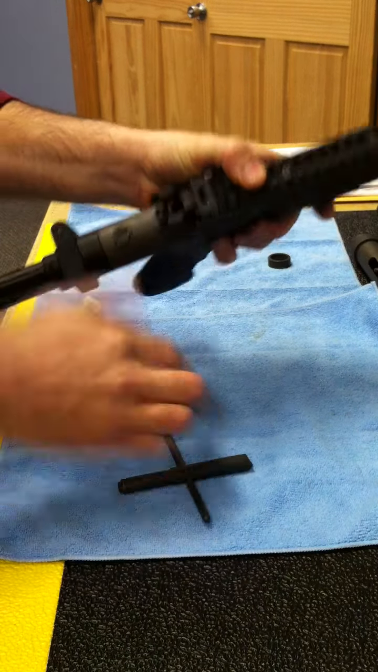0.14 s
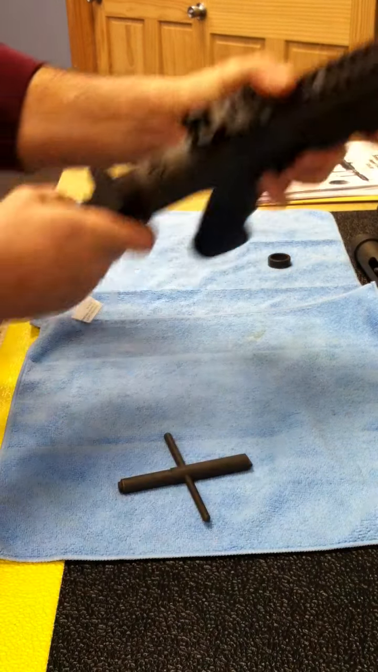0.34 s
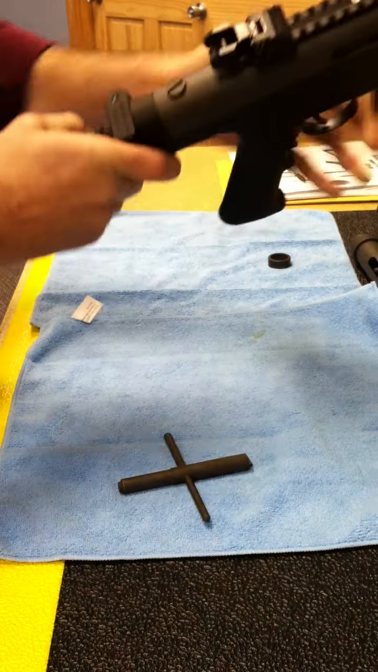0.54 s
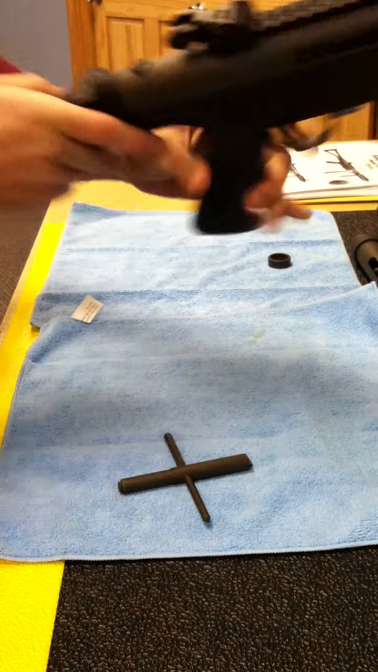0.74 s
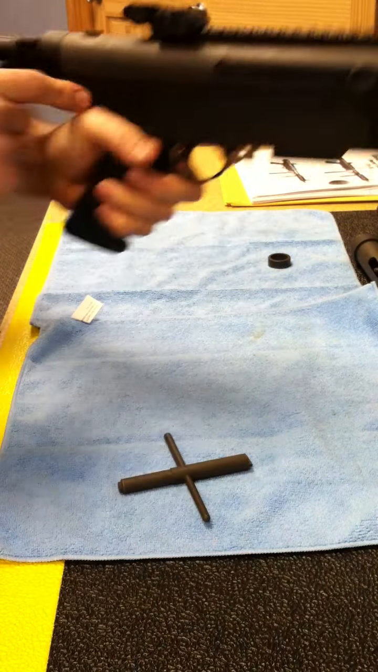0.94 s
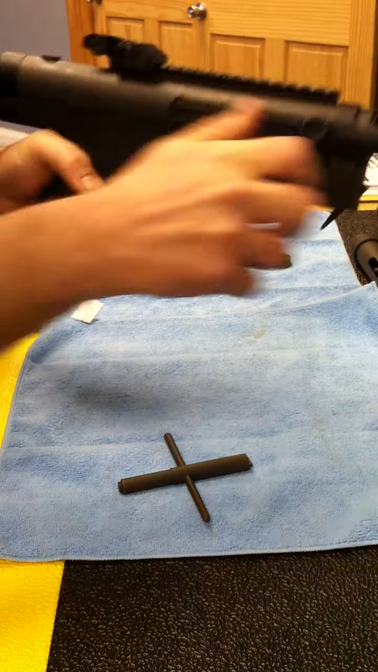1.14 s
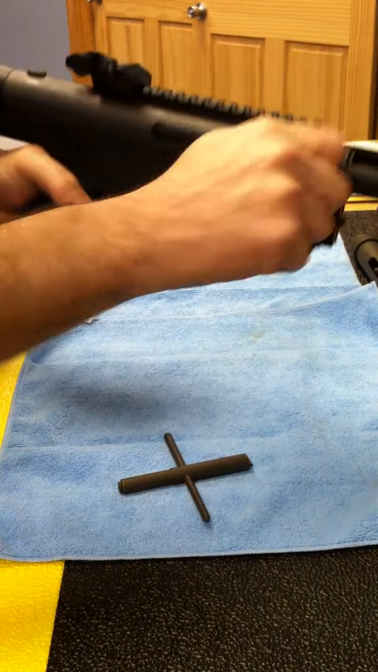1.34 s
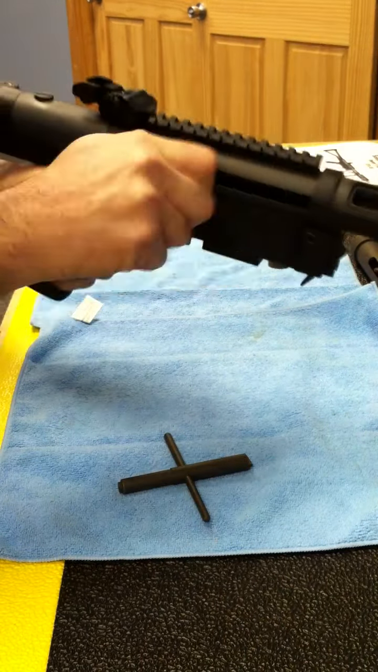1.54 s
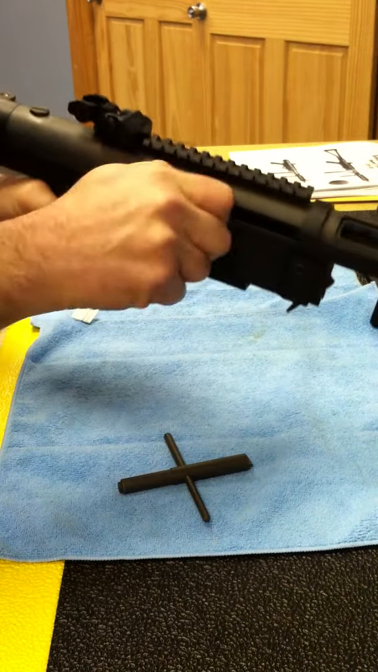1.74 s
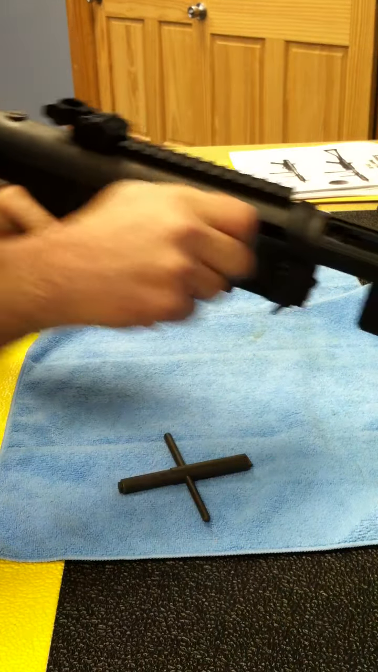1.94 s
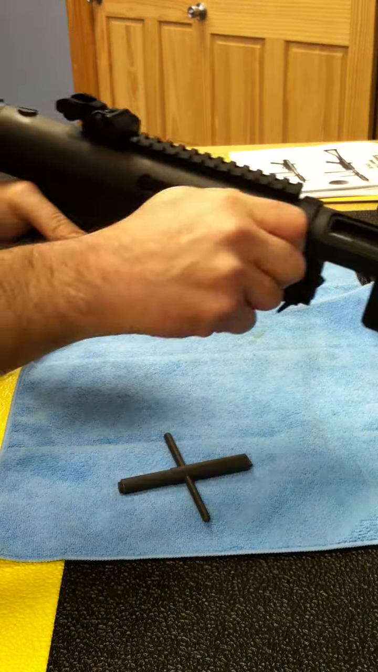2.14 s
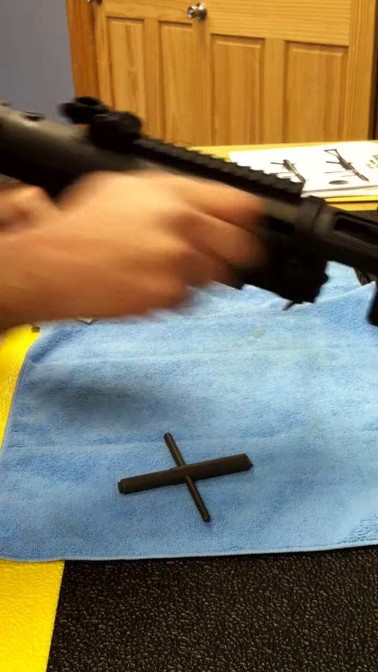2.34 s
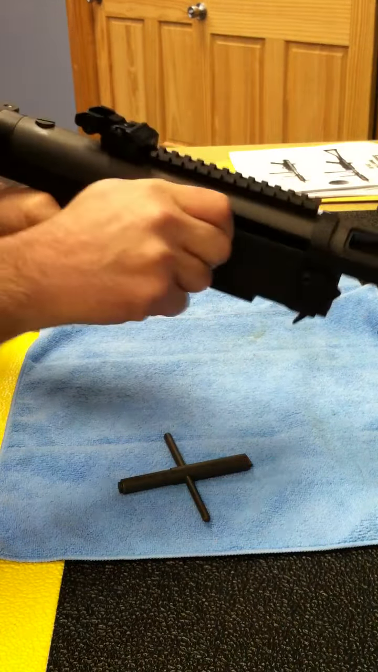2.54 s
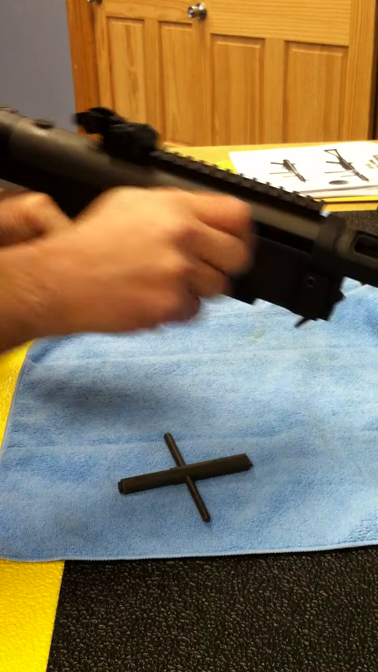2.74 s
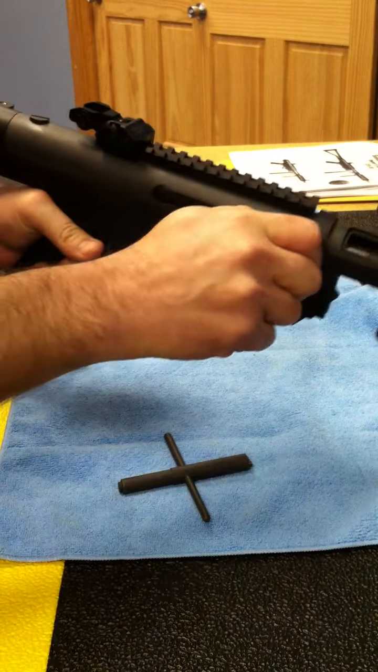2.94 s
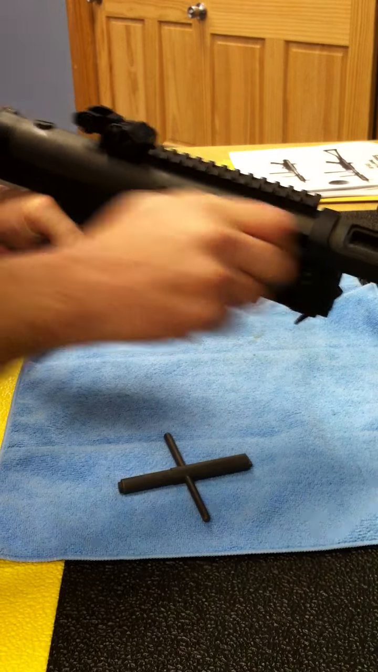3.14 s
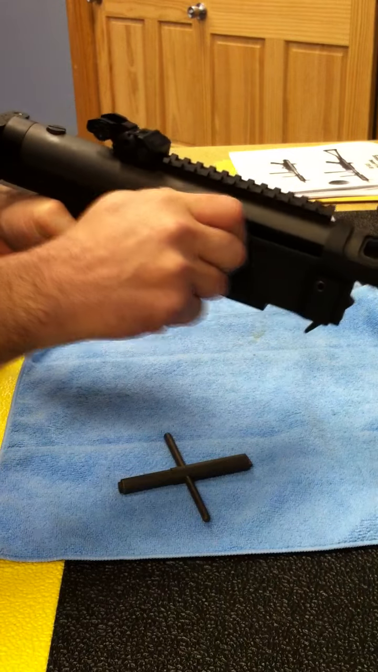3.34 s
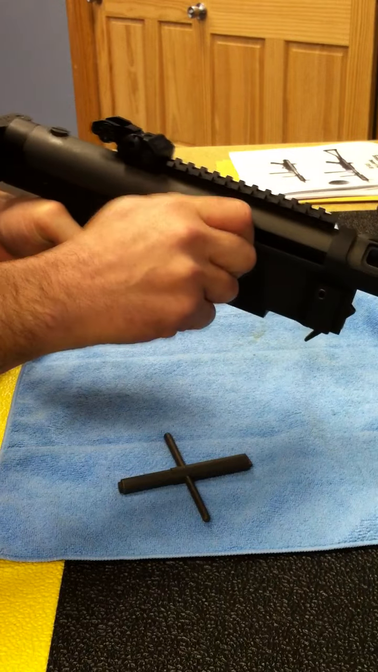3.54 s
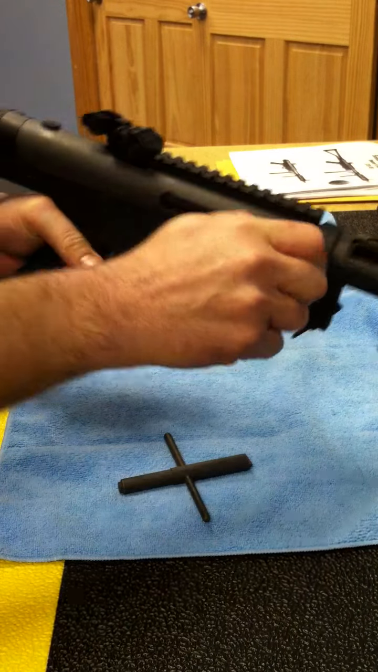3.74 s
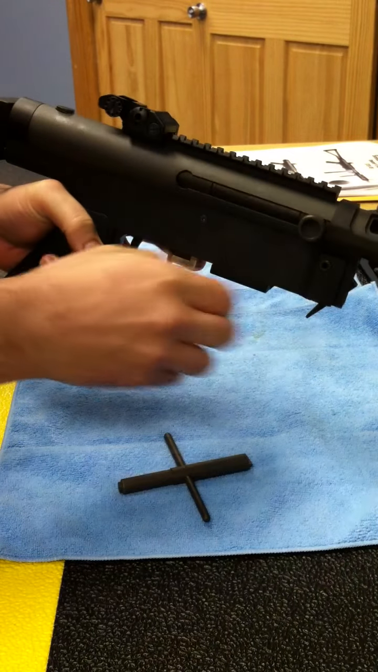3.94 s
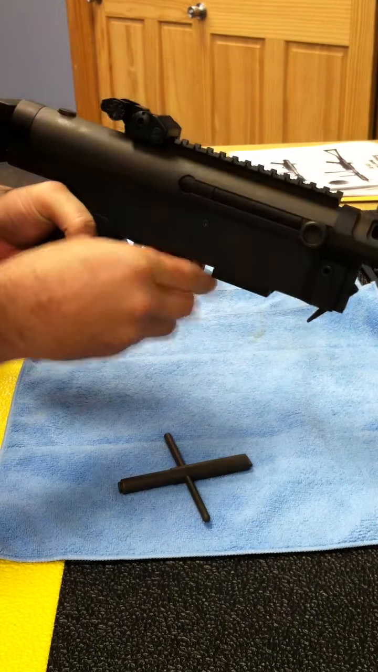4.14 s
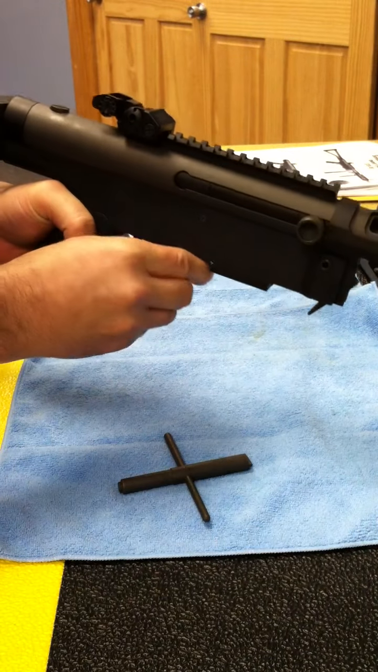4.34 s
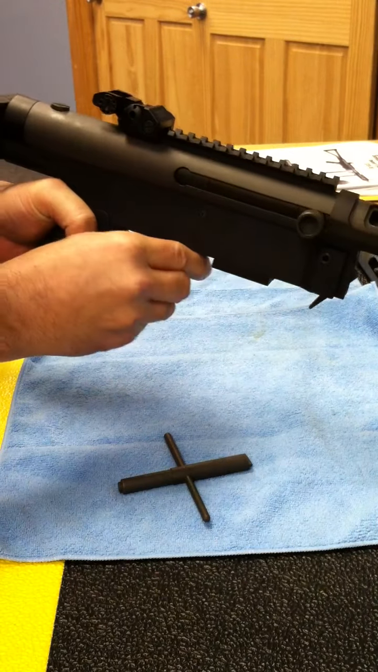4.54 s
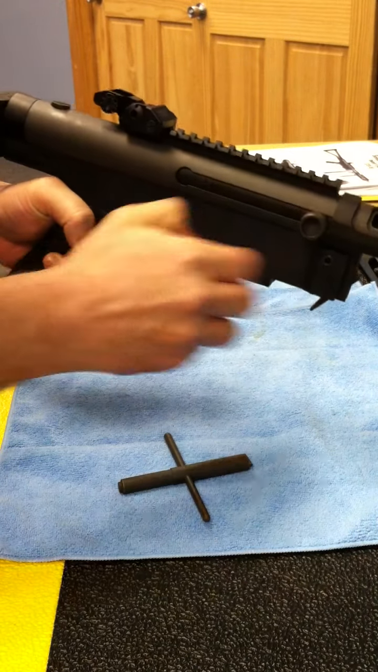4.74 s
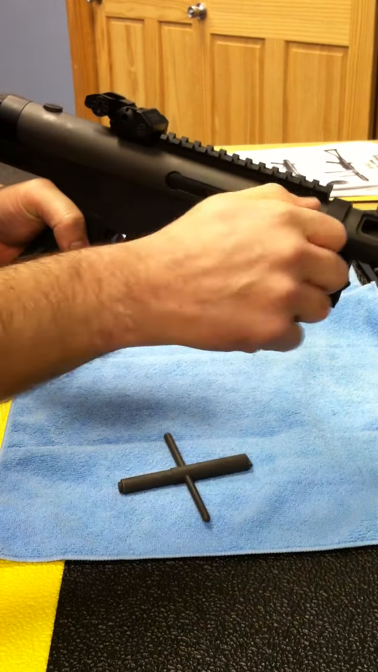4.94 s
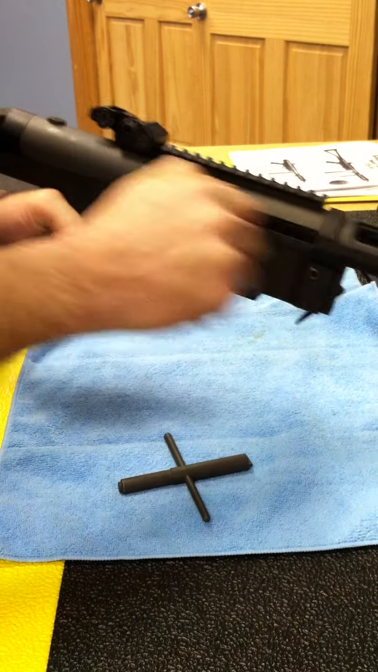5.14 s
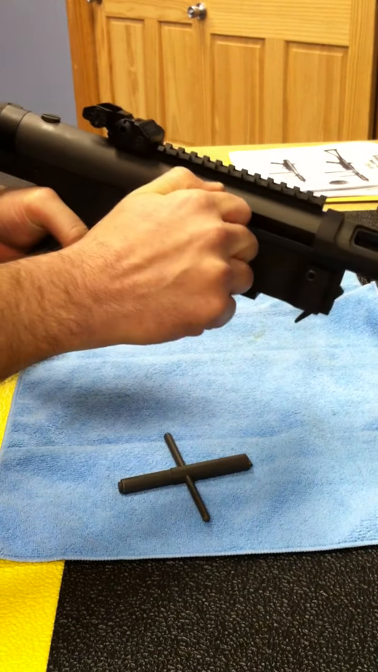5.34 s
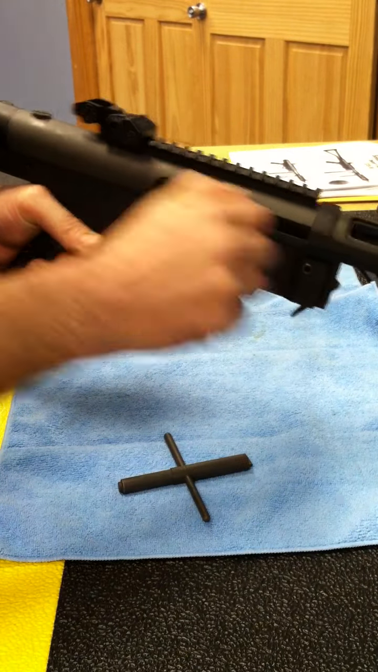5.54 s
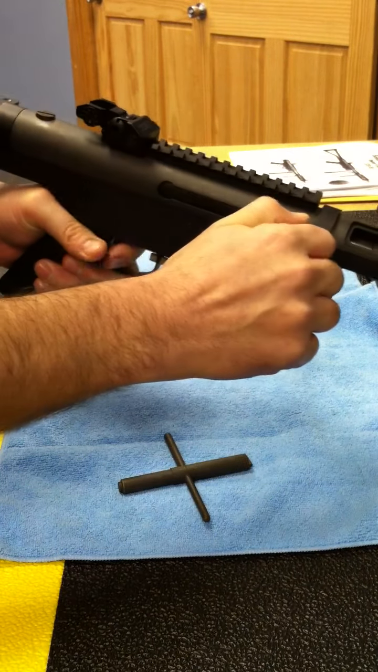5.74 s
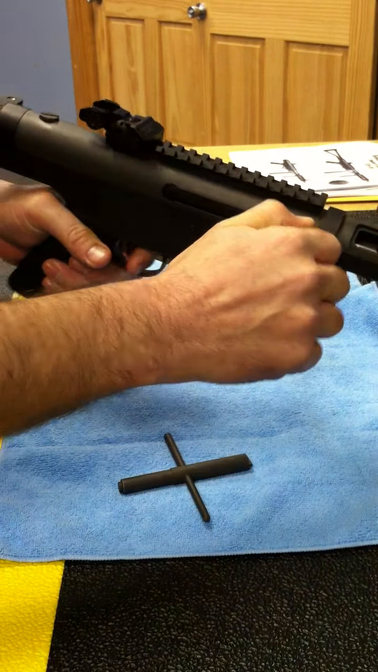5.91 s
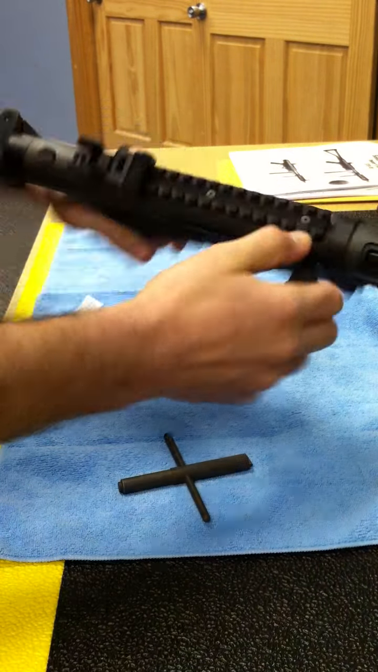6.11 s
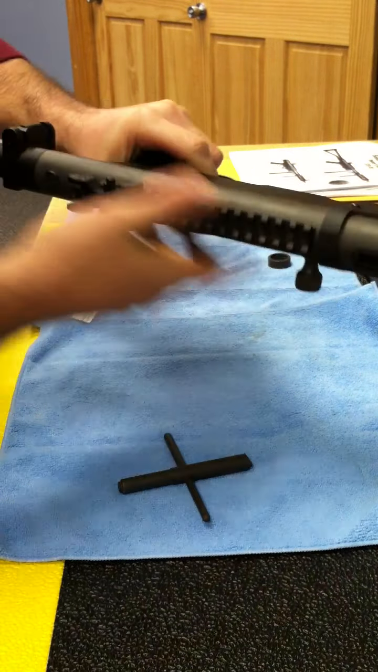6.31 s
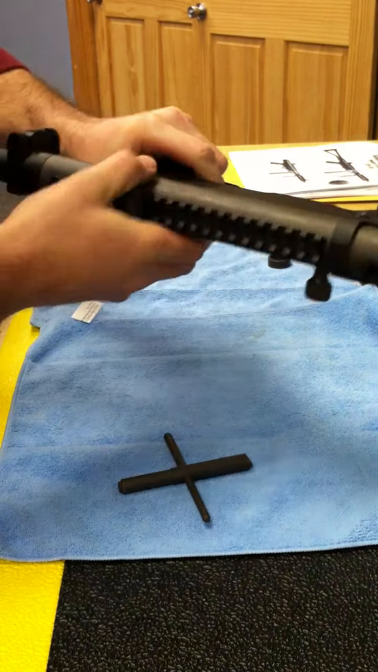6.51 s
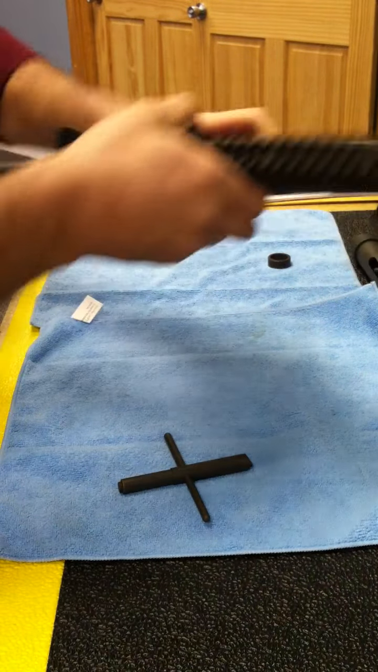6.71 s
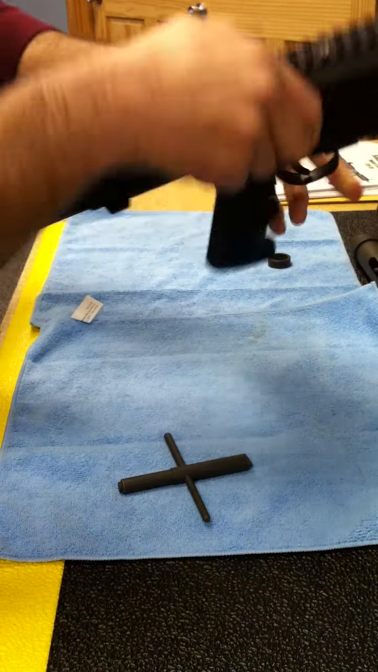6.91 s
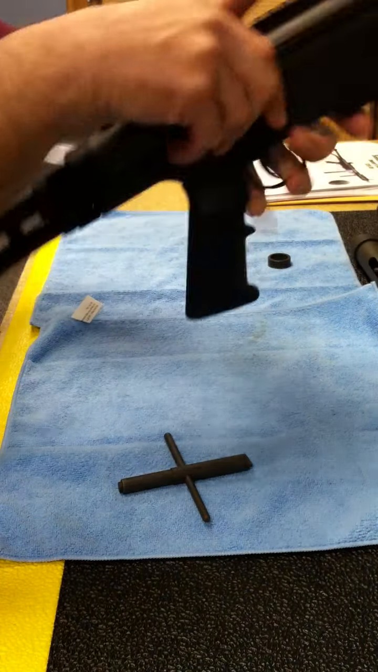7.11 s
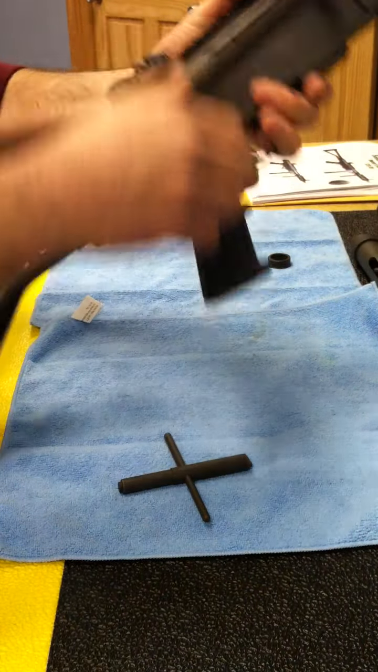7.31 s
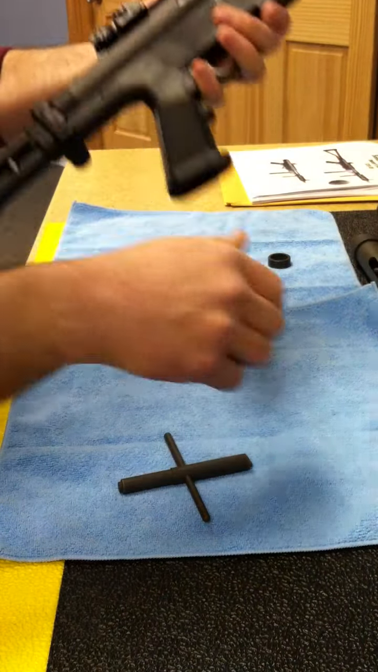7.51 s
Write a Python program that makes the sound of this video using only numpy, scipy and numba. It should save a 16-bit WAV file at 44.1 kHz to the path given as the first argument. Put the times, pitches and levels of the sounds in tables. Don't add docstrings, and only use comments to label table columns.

```python
import sys
import numpy as np
from scipy import signal
from scipy.fft import rfft, irfft
from scipy.io import wavfile
from scipy.ndimage import uniform_filter1d
from numba import njit

SR = 44100
rng = np.random.default_rng(int(sys.argv[2]) if len(sys.argv) > 2 else 0)


def unload_audio(sound):
    columns = np.transpose(np.atleast_2d(sound))
    steps = np.round(np.clip(columns, -1, 1) * 32767)
    wavfile.write(sys.argv[1], SR, steps.astype(np.int16))


def ratio(d):
    e = np.asarray(d, float) / 20
    return 10 ** e


N = 333788

# (time [s], peak [dB], body shift [dB], treble shift [dB], contact chatter [ms])
STOP_BLOWS = [
    (1.6465, -4.5, 1.5, 5, 3.2),
    (1.6654, -9, 4.5, -6, 4.8),
    (2.5038, -8, -9, 4.5, 5.2),
    (2.5184, -4, 2, -9, 1.8),
    (3.3197, -11.5, -3, 1.5, 3.3),
    (3.3352, -8, 2.5, -8.5, 1.5),
    (5.2825, -6, 0.5, 7, 2.48),
    (5.3033, -15.5, 5, -6.5, 4.6),
]
# (time [s], peak [dB], body shift [dB], treble shift [dB], contact chatter [ms])
CATCH_BLOWS = [(1.7545, -14.5, 0, 1.5, 15.6), (1.758, -3.5, 4, 2, 2.8), (2.66, -14.5, -1, -0.5, 11.4),
               (2.6656, -9.5, 0.5, -2, 7.8), (3.471, -17.5, -3, 2, 2.1), (3.4742, -18, -0.5, 4, 0.93),
               (3.4773, -11.5, 2, 0, 4.2), (5.3949, -13, 0.5, 13, 3.6), (5.399, -6.5, 5, 0, 3),
               (5.6517, -19, -4, 1.5, 7.9), (5.6589, -13, -4.5, -7.5, 2.8)]
# (time [s], peak [dB], body shift [dB], treble shift [dB], contact chatter [ms])
SLAM_BLOWS = [
    (2.121, -31, -6.5, -7.5, 1.9),
    (2.1245, -3.5, -11, 1.5, 2.43),
    (2.9584, -34.5, 1, 7.5, 3.5),
    (2.959, -5.5, -11, 5, 2.4),
    (3.7723, -34.5, 3.5, -6.5, 1.8),
    (3.776, -4.5, -10.5, 4, 1.5),
    (5.728, -25.5, -3.5, -1, 2.24),
    (5.7316, -4, -11.5, 2.5, 1.95),
]


def colour(x, tone):
    hz, db = np.transpose(tone)
    size = 4096
    grid = np.log(np.arange(size // 2 + 1) * SR / size + 1)
    ceps = irfft(np.interp(grid, np.log(hz), db) * np.log(10) / 20)
    ceps[1:size // 2] *= 2
    ceps[size // 2 + 1:] = 0
    response = irfft(np.exp(rfft(ceps)))
    return signal.fftconvolve(x, response)[:len(x)]


def unit(x):
    return x / np.sqrt(np.mean(x ** 2))


def even(burst, width_hz):
    spectrum = rfft(burst)
    broad = uniform_filter1d(np.abs(spectrum) ** 2, int(width_hz * len(burst) / SR))
    return irfft(spectrum / np.sqrt(broad), len(burst))


def add(out, s, x):
    i = int(s * SR)
    out[i:i + len(x)] += x[:len(out) - i]


def ring(modes, sway):
    t = np.arange(SR // 4)[:, None] / SR
    hz, db, t60 = np.transpose(modes)
    strength = ratio(db + 4.0 * sway[0])
    decay = np.exp(-np.log(1000) * t / t60)
    tones = np.sin(2 * np.pi * hz * (1 + 0.014 * sway[1]) * t)
    return (strength * decay * tones).sum(1)


def grit(rate, spread_db):
    k = int(SR / rate)
    steps = np.repeat(np.minimum(rng.exponential(size=N // k + 1), 2), k)[:N]
    return unit(rng.standard_normal(N) * ratio(spread_db * uniform_filter1d(steps, k)))


@njit
def svf(x, hz, width):
    y, b, l = np.empty(len(x)), 0., 0.
    for i in range(len(x)):
        g, k = np.tan(np.pi * hz[i] / SR), width / hz[i]
        v = (b + g * (x[i] - l)) / (1 + g * (g + k))
        b, l, y[i] = 2 * v - b, l + 2 * g * v, k * v
    return y


def blows(events, tone, ring_db):
    # (frequency [Hz], level [dB], t60 [s])
    steel = [(1505, -9.5, .025), (2190, -5, 0.03), (2667, -11.5, .025), (4700, -2, 0.0099),
             (7480, -12, 0.14)]
    room_ring_db, room_peak_db = -20, -4.5
    out, t = np.zeros((2, N)), np.arange(SR // 20) / SR
    push = 1. * (t == 0)
    for s, peak_db, body_db, treble_db, chatter_ms in events:
        decay = np.exp(-t * 1000 / max(chatter_ms, .2)) + 0.061 * np.exp(-t / 0.0049)
        chatter = rng.standard_normal(len(t)) * decay * (1 - np.exp(-t / 0.00014))
        contact = colour(even(chatter, 1100), [(250, -33), (600, 0)])
        contact += colour(push, [(300, 4.0), (700, -27.5)])
        modes = ratio(ring_db) * ring(steel, rng.standard_normal((2, len(steel))))
        modes[0] = 1
        hit = colour(signal.fftconvolve(contact, modes), tone)
        wide_modes = np.append(1, ratio(room_ring_db) * modes[1:])
        wide = colour(wide_modes, np.minimum(tone, [SR, room_peak_db]))
        shift = [(1400, body_db), (2200, 0.013), (5000, 0.0052), (7000, treble_db)]
        hit, wide = colour(hit, shift), colour(wide, np.array(shift) * [1, .45])
        for row, x in zip(out, (hit, wide)):
            add(row, s, x[:SR // 4] * ratio(peak_db) / np.abs(hit).max())
    return out


def bolt_blows():
    # (frequency [Hz], level [dB per Hz])
    stop_tone = [(24, -60.5), (40, -35), (194, -36), (354, -12), (503, -12.5), (1240, -0.5), (1760, -5.5),
                 (1900, -3.5), (7730, -8), (10200, -17.5), (16000, -46.5)]
    # (frequency [Hz], level [dB per Hz])
    catch_tone = [(24, -58.5), (40, -28), (1040, -6.5), (1340, 1), (1680, -9), (1900, -2.5), (2630, 2.5),
                  (3560, -5), (4340, -3.5), (9940, -13.5), (16000, -46.5)]
    # (frequency [Hz], level [dB per Hz])
    slam_tone = [(40, -37), (300, -18), (800, 1.5), (1300, -2), (2200, -7.5), (4600, -1), (7000, -4),
                 (9900, -10), (12500, -25.5), (16000, -39)]
    stops = blows(STOP_BLOWS, stop_tone, -38.0)
    catches = blows(CATCH_BLOWS, catch_tone, -45.5)
    return stops + catches + blows(SLAM_BLOWS, slam_tone, -32.0)


def stroke(start, end):
    t = np.arange(N) / SR
    onset_s = 0.012
    gone = np.clip((t - start) / (end - start), 0, 1)
    gate = np.clip(np.minimum(t - start, end + 0.012 - t) / onset_s, 0, 1)
    return gone, gate


def strokes():
    # (start [s], end [s], scrape level at the end [dB], whistle share [dB])
    pulls = [
        (1.518, 1.627, -44.5, -4),
        (2.435, 2.512, -43.5, -1.5),
        (3.245, 3.314, -48, 1),
        (5.176, 5.28, -46, -5.5),
    ]
    # (start [s], end [s], scrape level at the crest [dB], whistle share [dB])
    returns = [
        (2.024, 2.122, -49.5, 6),
        (2.847, 2.96, -49.5, 4.5),
        (3.68, 3.773, -49, 2),
        (5.673, 5.727, -49.5, 1),
    ]
    shut_hz, back_hz, latched_hz = 2860, 2450, 2330
    pull_swell_db_per_s, pull_ease = 85, 1.4
    whistle_swell_db = 10.5
    return_dip_db, return_ease = 3.5, 1.4
    gain, hz, share = np.zeros(N), np.full(N, 2600.), np.zeros(N)
    for pull, rows in ((True, pulls), (False, returns)):
        for start, end, level_db, whistle_db in rows:
            gone, gate = stroke(start, end)
            if pull:
                loss_db = pull_swell_db_per_s * (end - start) * (1 - gone)
                pitch = shut_hz + (back_hz - shut_hz) * gone ** pull_ease
            else:
                loss_db = return_dip_db * (2 * gone - 1) ** 2
                pitch = shut_hz + (latched_hz - shut_hz) * (1 - gone) ** return_ease
            gain += gate * ratio(level_db - loss_db)
            share += gate * ratio(whistle_db + pull * whistle_swell_db * (gone - 1.0))
            hz = np.where(gate > 0, pitch, hz)
    return gain, share, hz


def slides():
    gain, share, hz = strokes()
    rub = grit(400, 2.0)
    patchy = ratio(2.3 * unit(uniform_filter1d(rng.standard_normal(N), size=400)))
    whistle = unit(svf(svf(rub, hz, 450.), hz, 450.))
    whistle += ratio(-15.0) * unit(svf(rub, 1.7 * hz, 450.))
    upper_hz = 4900 + .85 * hz
    whistle += ratio(-2.5) * unit(svf(grit(60, 2.5), upper_hz, 700.)) / np.maximum(share, .2) ** 0.4
    scrape = unit(colour(rub, [(300, -21.0), (1300, -2.0), (3000, 0.5), (4200, -4.5), (7800, -3.5),
                               (10500, -17.5), (15000, -42)]))
    grind = unit(colour(grit(200, 3.2), [(200, -22.5), (600, -4), (1600, -3.0), (2600, -18.0)]))
    grind = ratio(-14) * grind / np.maximum(share, .2)
    return colour(gain * (scrape + share * patchy * whistle + grind), [(11500, -1.5), (14500, -22.0)])


def pin_and_spring():
    # (time [s], level [dB])
    pin_rings = [
        (2.1245, -56),
        (2.959, -48),
        (3.776, -48),
        (5.7318, -60),
    ]
    pin_hz, pin_t60_s = 9930, 0.28
    spring_hz, spring_t60_s, spring_db = 7080, 0.35, -46
    out, t = np.zeros(N), np.arange(SR // 3) / SR
    for s, level_db in pin_rings:
        decay = np.exp(-np.log(1000) * t / pin_t60_s)
        add(out, s, ratio(level_db) * decay * np.sin(2 * np.pi * pin_hz * t))
    for s, peak_db, *_ in SLAM_BLOWS[1::2]:
        pair = np.sin(2 * np.pi * spring_hz * t) + np.sin(2 * np.pi * (spring_hz + 75) * t)
        decay = np.exp(-np.log(1000) * t / spring_t60_s)
        add(out, s, ratio(peak_db + spring_db) * decay * pair)
    return out


def ticks():
    # (time [s], peak [dB], pitch of the part [Hz])
    finger_ticks = [(0.7452, -56, 4700), (0.919, -55, 8250), (1.3394, -35.5, 3000), (2.3747, -40, 3900),
                    (3.1964, -43, 3664), (4.477, -58, 1750), (4.558, -45, 3196), (4.5705, -52, 6790),
                    (4.671, -61, 2800), (4.7546, -54.5, 3675), (4.805, -54.5, 5980), (5.0158, -31, 7160),
                    (5.037, -54, 6600), (5.0478, -42.5, 2270), (5.0832, -39, 5150), (5.619, -45, 6000),
                    (5.9477, -29, 4594), (6.3814, -47.5, 3140), (6.809, -62, 4990), (6.839, -62, 2500),
                    (7.2549, -57, 6510), (7.43, -64, 1360), (7.5413, -53.5, 6460)]
    # (time [s], peak [dB], pitch of the part [Hz])
    snags = [(1.5127, -37, 2550), (1.5318, -39, 7850), (1.541, -35.5, 1757), (1.553, -42, 1656),
             (1.5747, -32, 7910), (1.594, -32.5, 7394), (1.618, -29, 4700), (2.02, -28.5, 1499),
             (2.4436, -43.5, 2732), (2.471, -34, 4600), (2.857, -40.5, 7000), (5.18, -40, 3800),
             (5.214, -37.5, 7580), (5.7132, -24, 3000)]
    # (frequency [Hz], level [dB per Hz])
    tick_tone = [(400, -22.5), (1300, -6.5), (3000, -2), (7500, -2), (11000, -13), (16000, -35.5)]
    part_width, part_peak_db = 1.3, 7
    out, t = np.zeros((2, N)), np.arange(SR // 50) / SR
    for s, peak_db, hz in sorted(finger_ticks + snags):
        chatter = rng.standard_normal(len(t)) * np.exp(-t / 0.003) * (1 - np.exp(-t / 0.00018))
        chatter = even(chatter, 1500)
        part = [(hz / part_width, 0), (hz, part_peak_db), (hz * part_width, 0), (hz * part_width ** 2 * 2, -9)]
        tick = colour(colour(chatter, tick_tone), part)
        wide = colour(colour(1. * (t == 0), tick_tone), part)
        for row, x in zip(out, (tick, wide)):
            add(row, s + 0.00064, x * ratio(peak_db) / np.abs(tick).max())
    return out


def thuds():
    # (time [s], peak [dB], tap pitch [Hz], thud share [dB])
    taps = [
        (0.069, -27.5, 910, -19),
        (.157, -59.5, 1200, 20.5),
        (6.958, -48.5, 1612, -30),
        (7.02, -55.5, 1351, -30),
    ]
    # (frequency [Hz], level [dB], t60 [s])
    table_modes = [(110, -9, .07), (170.5, 12, 0.13), (209, 6, 0.097), (262.4, 6, 0.26), (320, 5.5, 0.11),
                   (414, 5.5, 0.069), (497, -4, 0.2)]
    out, t = np.zeros(N), np.arange(SR // 4) / SR
    for s, peak_db, tap_hz, thud_db in taps:
        tap = np.sin(2 * np.pi * tap_hz * t) * np.exp(-t / 0.0011) * (1 - np.exp(-t / 0.00067))
        boom = ring(table_modes, rng.standard_normal((2, len(table_modes)))) * (1 - np.exp(-t / 0.002))
        add(out, s, ratio(peak_db) * (tap + ratio(thud_db) * boom / np.abs(boom).max()))
    return colour(out, [(40, -25), (100, 2)])


def hands():
    # (time [s], length [s], level [dB])
    shifts = [(0.33, 0.33, -81), (0.72, 0.05, -83), (0.83, 0.22, -71), (1.102, 0.2, -92),
              (1.365, 0.045, -75), (4.399, 0.09, -86), (4.548, 0.06, -74), (4.751, 0.083, -73.5),
              (5.09, 0.03, -71), (5.171, 0.015, -57), (6.248, 0.044, -83), (6.309, 0.08, -77),
              (6.8, 0.05, -75), (7.2, 0.09, -78), (7.535, 0.015, -74.5)]
    grip_s, let_go_db_per_s = 0.0046, 108
    t, gain = np.arange(N) / SR, np.zeros(N)
    for s, length, db in shifts:
        catch = np.clip((t - s) / grip_s, 0, 1)
        gain += catch * ratio(db - let_go_db_per_s * np.clip(t - s - length, 0, 1))
    return gain * unit(colour(grit(150, 0.83), [(600, -9.5), (2500, 9.0), (8000, 4.5), (14000, -29.5)]))


def room(near, wide):
    # (delay [s], level [dB], smear [ms])
    echoes = [(.0035, -9.5, 2.2), (.0092, -10, 2.8), (0.0202, -17.5, 1.4), (.036, -18, 8.3)]
    # (frequency [Hz], level [dB], t60 [s])
    tail_tone = [(203.4, -12.5, 0.12), (350, -8.5, 0.97), (605, 0.5, 0.43), (1200, 0, 0.93), (3000, -8, .7),
                 (4330, -4, .75), (7000, -1, 0.22), (10975, -9.5, 0.58), (15000, -18.5, .22)]
    tail_db, tail_start_s, tail_rise_s = -14, 0.017, 0.03
    t = np.arange(int(1.2 * SR)) / SR
    hz, db, t60 = np.transpose(tail_tone)
    tail = 0
    for centre in 100 * 2 ** np.arange(0, 7.6, .5):
        band = unit(svf(rng.standard_normal(len(t)), np.full(len(t), centre), centre / 2)) * np.sqrt(centre)
        at = np.log(centre)
        decay_db = 60 * t / np.interp(at, np.log(hz), t60)
        tail = tail + band * ratio(np.interp(at, np.log(hz), db) - decay_db)
    tail = tail * np.clip((t - tail_start_s) / tail_rise_s, 0, 1) ** 0.8
    early, u = np.zeros(SR // 10), t[:SR // 50] * 1000
    for delay_s, echo_db, smear_ms in echoes:
        smear = rng.standard_normal(len(u)) * np.sqrt(u) * np.exp(-u / smear_ms)
        add(early, delay_s, ratio(echo_db) * smear / np.sqrt(np.sum(smear ** 2)))
    response = ratio(tail_db) * tail / np.sqrt(np.sum(tail ** 2))
    add(response, 0, early)
    reflected = signal.fftconvolve(wide, response)[:N]
    return near + colour(reflected, [(50, -18), (160, 3.5), (12000, -0.5), (15000, -16)])


def ducking():
    loud_db, deepest_db = -20, -10.5
    sink_s, hold_s, recover_s = 0.9, 0.35, 0.93
    t = np.arange(0, N / SR, .005)
    busy = np.zeros(len(t))
    for s, peak_db, *_ in STOP_BLOWS + CATCH_BLOWS + SLAM_BLOWS:
        if peak_db > loud_db:
            busy = np.maximum(busy, np.clip(np.minimum(t - s, s + hold_s - t) / .02, 0, 1))
    db = np.zeros(len(t))
    for i in range(1, len(t)):
        sink = busy[i] * (deepest_db - db[i - 1]) / sink_s
        recover = (1 - busy[i]) * db[i - 1] / recover_s
        db[i] = db[i - 1] + t[1] * (sink - recover)
    return np.interp(np.arange(N) / SR, t, db)


def air():
    # (frequency [Hz], level [dB per Hz])
    rush_tone = [(15, -49), (25, -19.5), (32, -31.5), (200, 1), (439, -6), (476, -11.5), (560, -9),
                 (1890, -16), (2280, -17.5), (4030, -21.5), (5730, -23), (12500, -34), (16000, -36.5)]
    # (frequency [Hz], level over the rush [dB])
    fan_tones = [(204.6, -15.5), (479.1, -11), (1798, -23)]
    rest_db = -65
    t = np.arange(N) / SR
    rush = unit(colour(grit(15, 0.8), rush_tone))
    waver = np.cumsum(rng.standard_normal(N)) * 0.0034
    hum = sum(ratio(db) * np.sqrt(2) * np.sin(2 * np.pi * hz * t + waver) for hz, db in fan_tones)
    return ratio(rest_db + ducking() - 0.5) * (rush + hum)


def scene():
    turn_s, turn_db = 5.2, 3
    scrape, thud = slides(), thuds()
    near, wide = bolt_blows() + ticks() + scrape + pin_and_spring()
    wide = wide * ratio(turn_db * (np.arange(N) > turn_s * SR))
    handled = room(near + thud, wide + ratio(-6) * thud)
    return (handled + hands() + air())[None]


def low_pass(x):
    return signal.sosfilt(signal.butter(12, 16640, fs=SR, output="sos"), x)


def record(dry):
    return low_pass(dry)


dry = scene()
out = record(dry)
unload_audio(out)
```